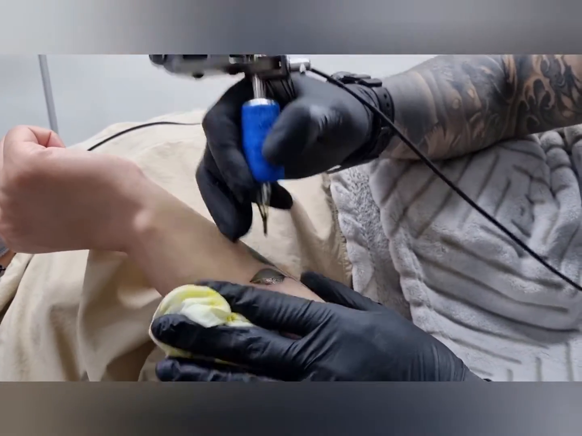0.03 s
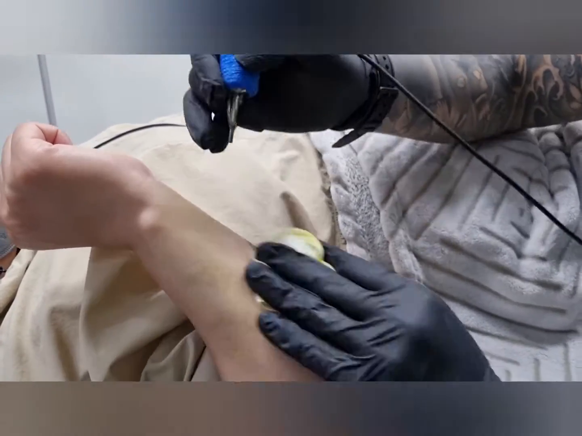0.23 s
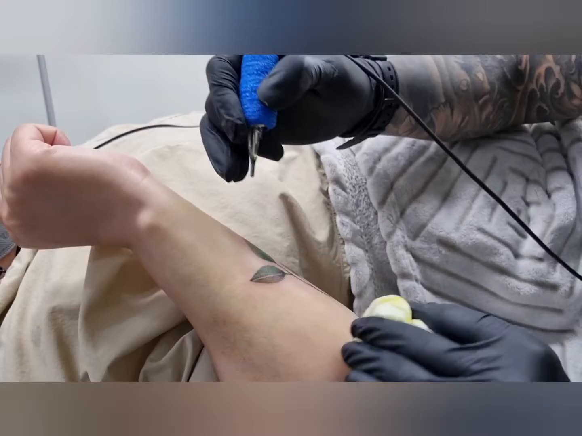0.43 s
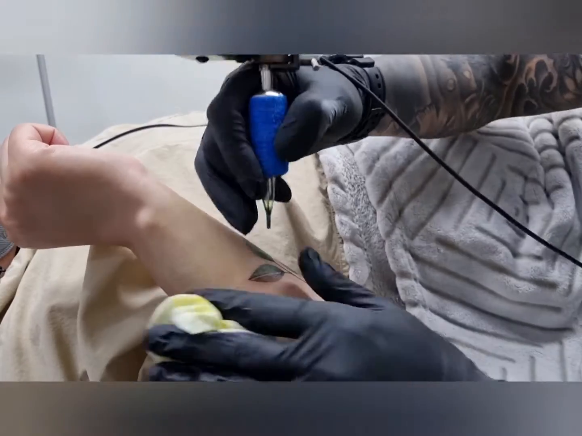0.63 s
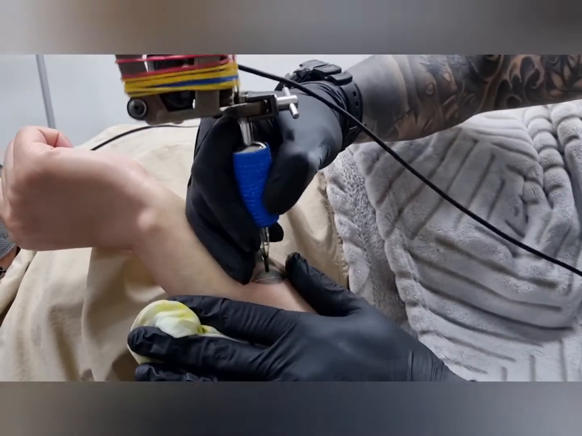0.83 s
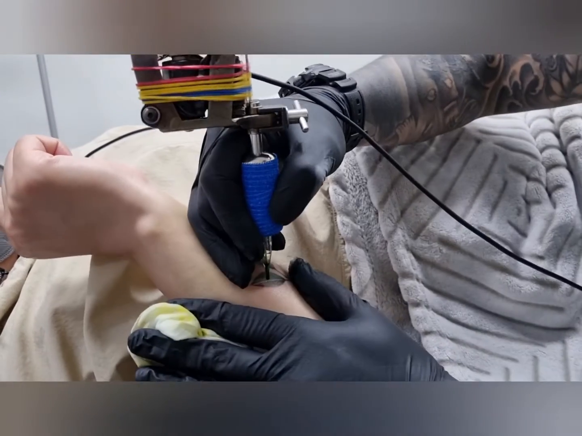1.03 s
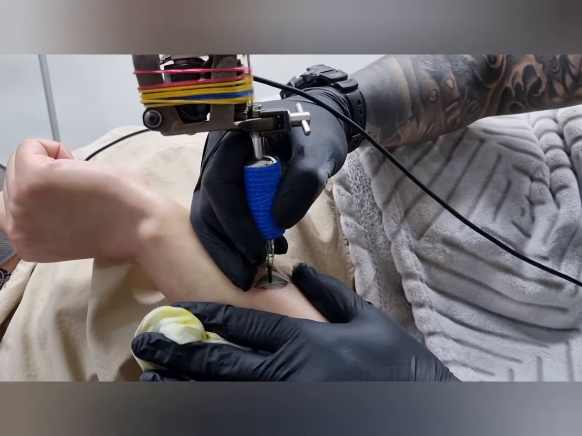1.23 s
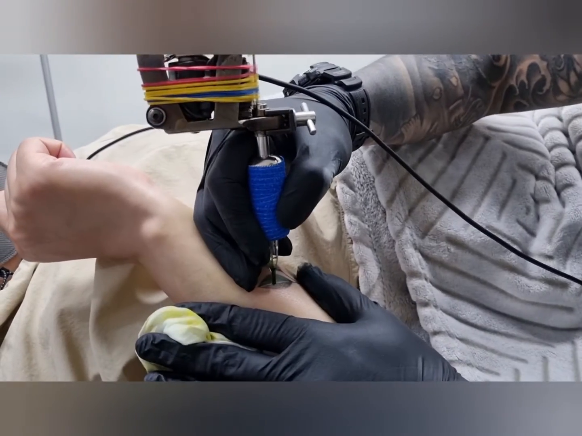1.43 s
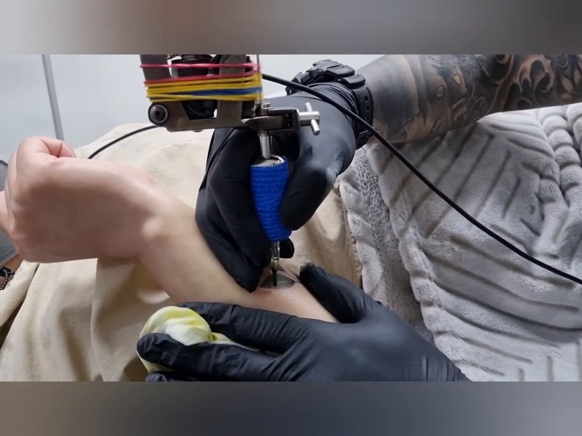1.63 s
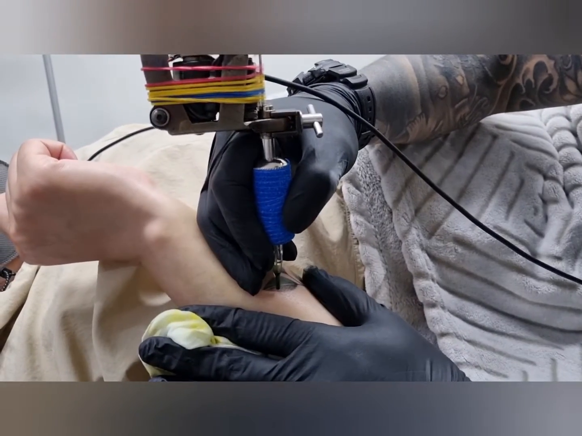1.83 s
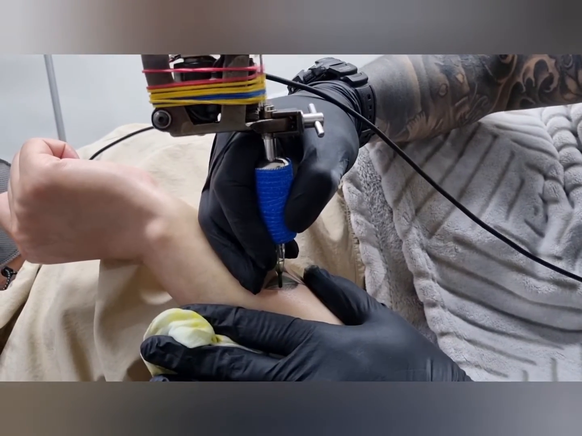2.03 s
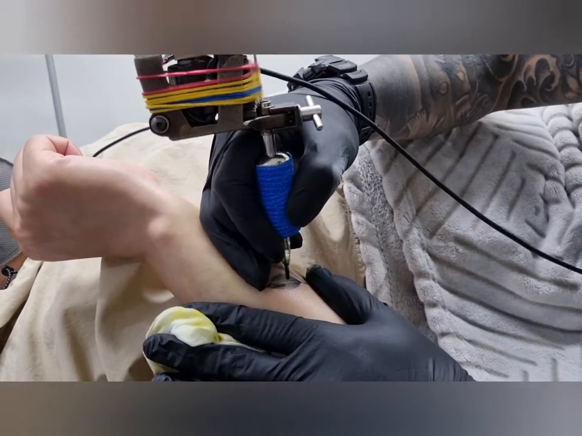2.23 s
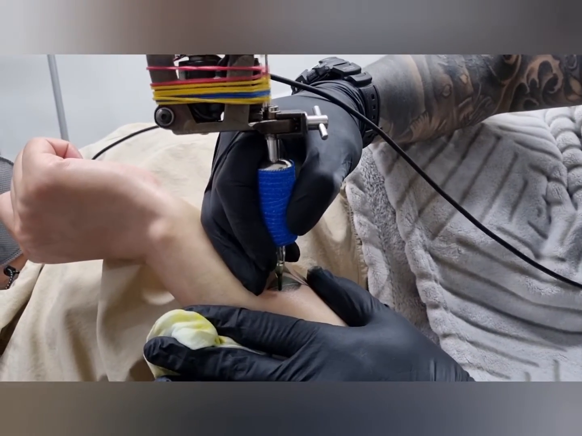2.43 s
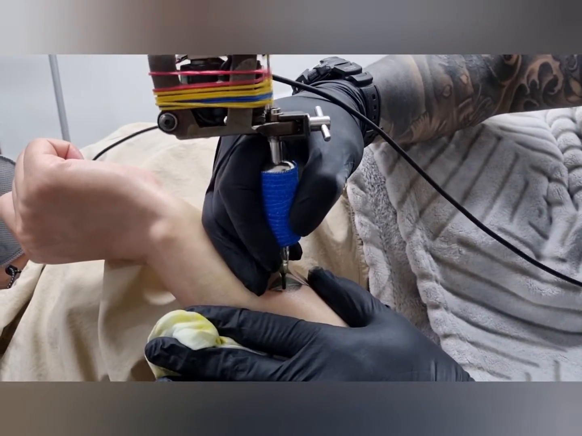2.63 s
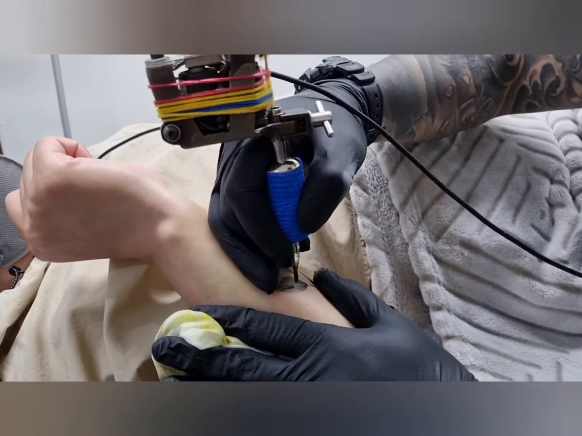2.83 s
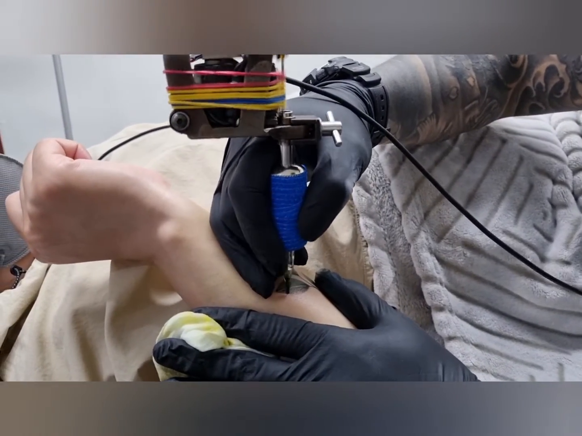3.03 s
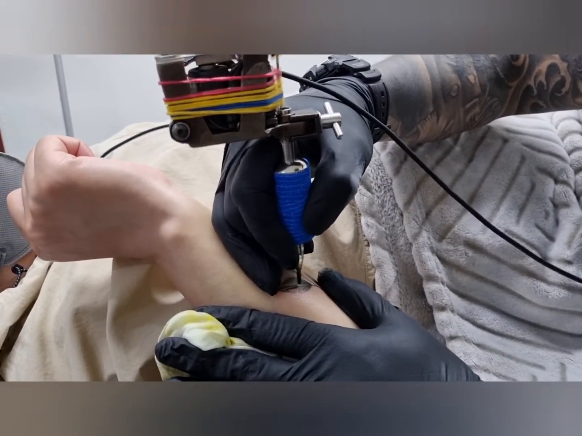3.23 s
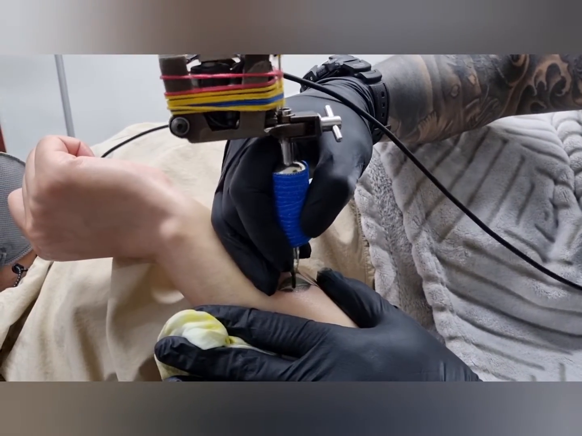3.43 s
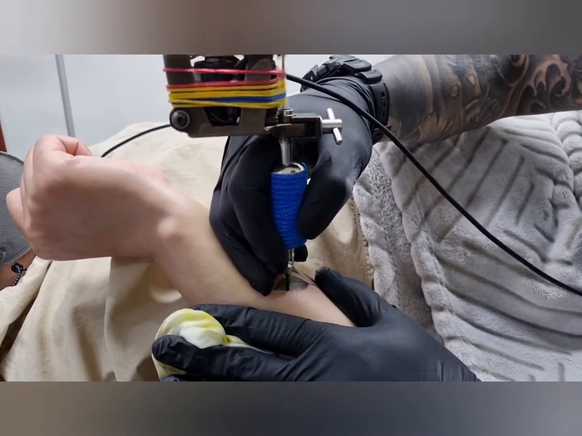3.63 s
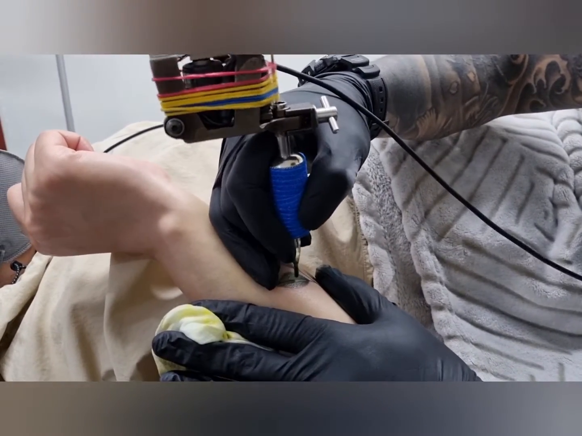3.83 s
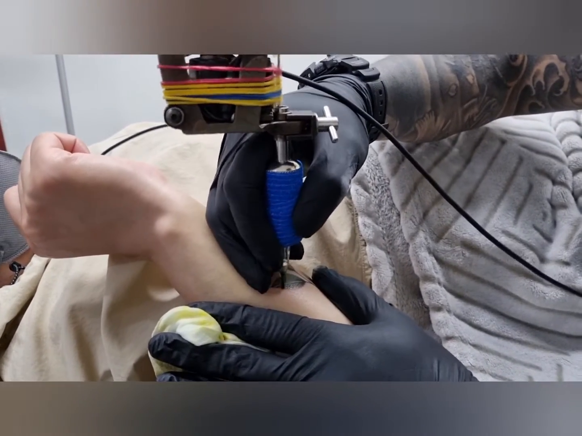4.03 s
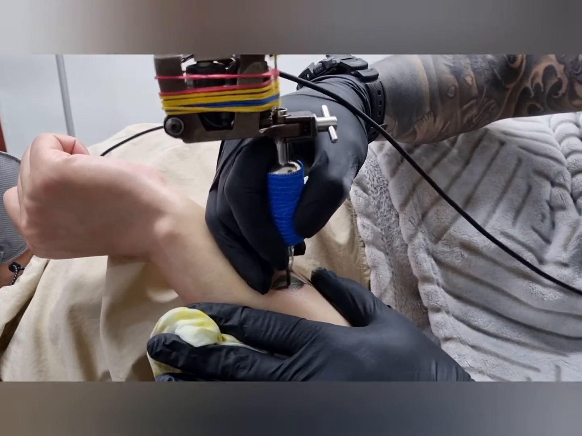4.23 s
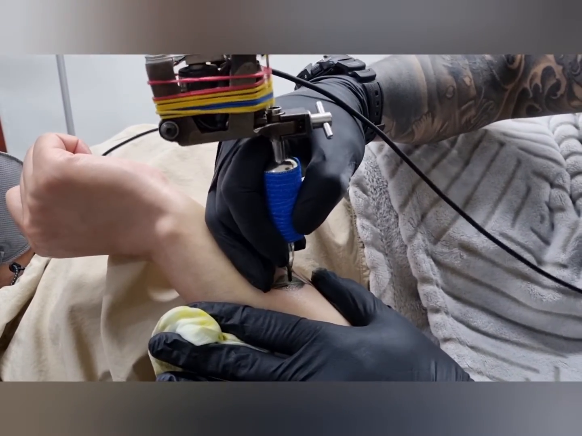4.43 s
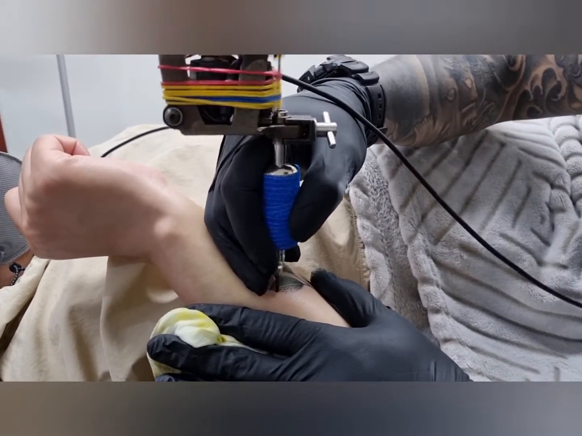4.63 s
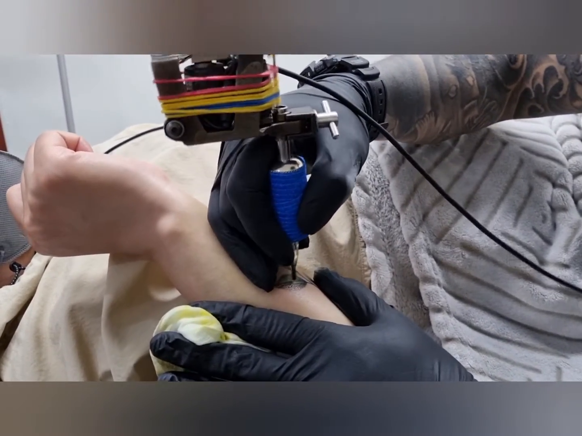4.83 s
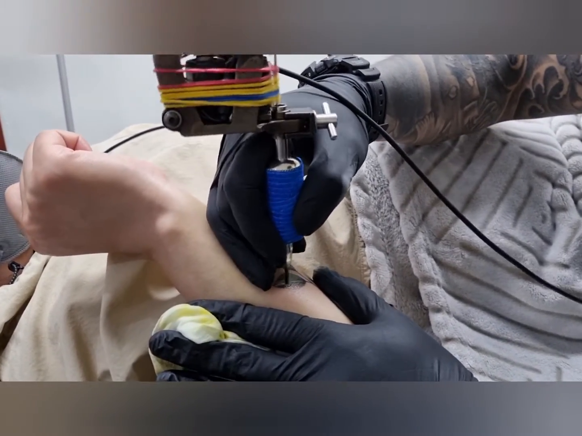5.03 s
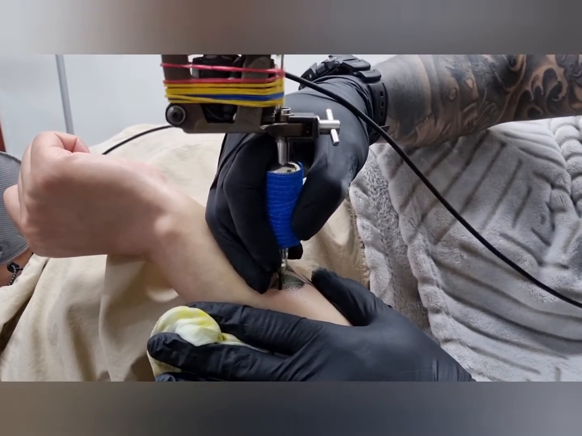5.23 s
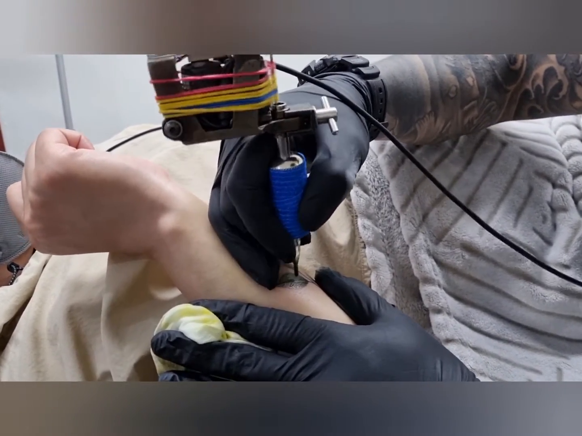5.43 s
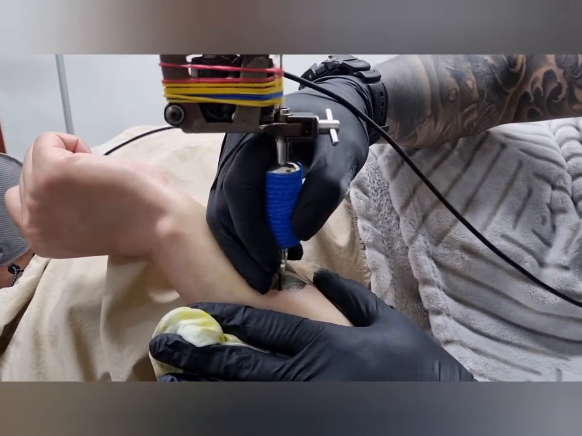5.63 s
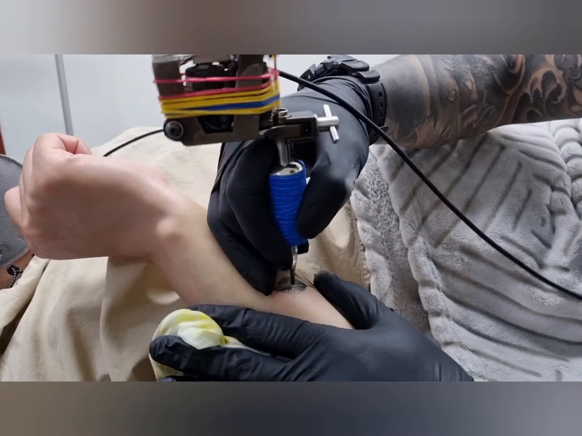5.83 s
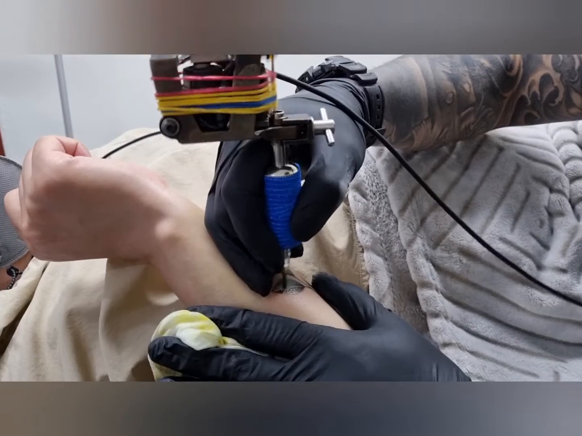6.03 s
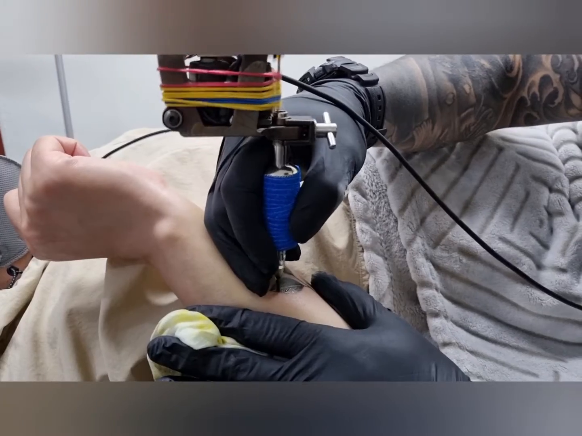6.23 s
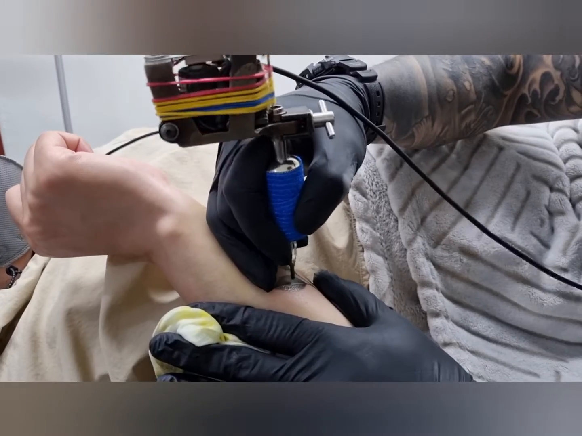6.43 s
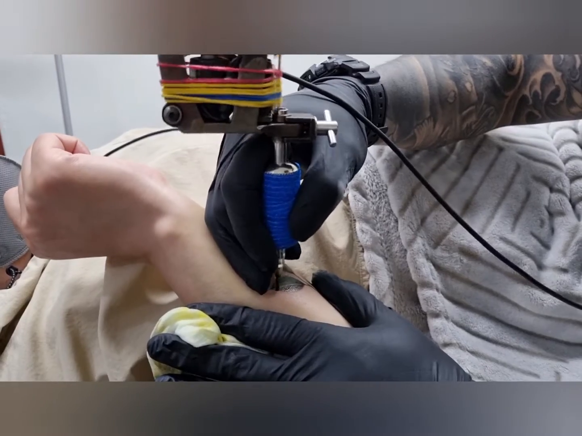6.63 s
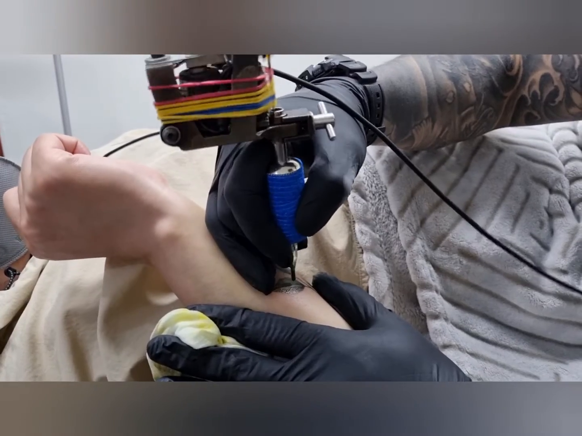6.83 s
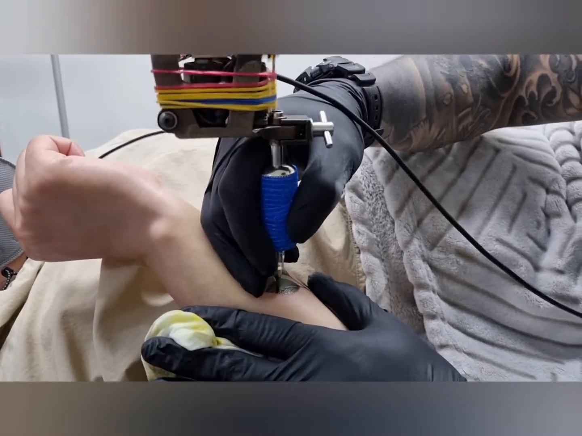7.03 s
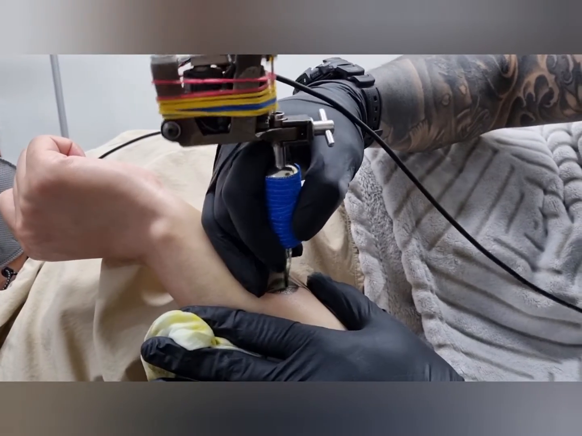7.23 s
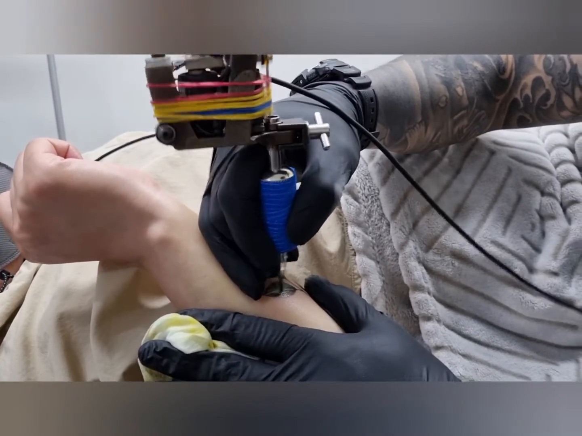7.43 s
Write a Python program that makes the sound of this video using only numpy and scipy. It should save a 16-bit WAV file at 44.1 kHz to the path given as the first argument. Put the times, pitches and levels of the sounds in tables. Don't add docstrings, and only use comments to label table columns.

```python
import sys
import numpy as np
from scipy import signal
from scipy.fft import rfft, irfft, next_fast_len
from scipy.io import wavfile
from scipy.ndimage import uniform_filter1d, map_coordinates

SR = 44100
rng = np.random.default_rng(int(sys.argv[2]) if len(sys.argv) > 2 else 0)


def linear_from_db(decibels):
    return 10 ** (np.asarray(decibels, float) / 20)


def dump(signal):
    limited = np.clip(np.atleast_2d(signal).T, -1, 1)
    pcm = np.round(limited * 32767).astype(np.int16)
    wavfile.write(sys.argv[1], SR, pcm)


N = 330750
T = np.arange(N) / SR


def unit(x):
    return x / np.sqrt(np.mean(x ** 2) + 1e-20)


def along(points, hz):
    f, v = np.transpose(points)
    return np.interp(np.log(hz + 1), np.log(f + 1), v)


def curves(rows):
    s, *cols = np.transpose(rows)
    return [np.interp(T, s, c) for c in cols]


def wobble(rate_hz):
    return map_coordinates(rng.standard_normal(int(N * rate_hz / SR) + 4), [T * rate_hz])


def filtered(x, response):
    m = next_fast_len(N + SR // 4)
    return irfft(rfft(x, m) * response(np.fft.rfftfreq(m, 1 / SR)), m)[..., :N]


def hiss(spectrum):
    return unit(filtered(rng.standard_normal((2, N)), lambda hz: linear_from_db(along(spectrum, hz))))


def steady(x, seconds):
    return x / np.sqrt(np.abs(uniform_filter1d(x ** 2, round(seconds * SR))) + 1e-9)


def panned(db):
    return linear_from_db(np.array([db / 2, -db / 2])).reshape(2, -1)


def peak(f, hz, width_hz):
    return 1j * f * width_hz / (hz * hz - f * f + 1j * f * width_hz)


def mode(force, hz, width_hz, pan_db, soft=False):
    def shape(f):
        response = peak(f, hz, width_hz)
        return np.abs(response) ** 2 if soft else response
    return unit(filtered(force, shape)) * panned(pan_db)


# Hz, dB per Hz.
AIR = [(25, -44), (82, -10), (170, -5), (640, -17), (1040, -24.5), (2500, -24.5), (5400, -30), (15800, -39)]
# Hz, dB per Hz.
CLOTH = [(24, -46), (40, -13), (123, -2.5), (179, -5), (386, -3.5), (703, -11), (900, -5.5), (1170, -4.5),
         (1980, -120)]
# time in s, level in dB.
ARMREST_RUMBLE = [(1.1, -101), (1.2, -65), (1.45, -71), (1.8, -72.5), (2.05, -70.5), (2.2, -95)]


def room_tone():
    sway = linear_from_db(2.5 * wobble(9) + 2.5 * wobble(30))
    work = np.interp(T, [.7, 1.1, 1.9, 2.3, 3.3, 4.1], [0.13, 0.93, 1.0, 0.79, 0.94, 0.68])
    cloth = linear_from_db(-65.5) * sway * work * hiss(CLOTH) * panned(8.1)
    shaking = mode(rng.standard_normal(N), hz=200, width_hz=38, pan_db=12, soft=True)
    rumble = linear_from_db(curves(ARMREST_RUMBLE)[0]) * sway * shaking
    air = linear_from_db(-71 + 4.2 * wobble(11)) * hiss(AIR)
    return air + cloth + rumble


# Hz, t60 in s.
STUDIO_T60 = [(500, .2), (3000, .2), (5300, .28), (9000, .2), (13500, .19), (16000, .16)]


def studio(x, count=22):
    out = np.zeros((2, N + SR))
    edges = np.linspace(0, N, count + 1).astype(int)
    for a, b in zip(edges, edges[1:]):
        hz, t, z = signal.stft(rng.standard_normal((2, SR // 3)), SR, nperseg=256)
        decay = linear_from_db(-60 * t / along(STUDIO_T60, hz)[:, None])
        tail = signal.istft(z * decay, SR, nperseg=256)[1]
        wet = signal.fftconvolve(x[:, a:b], tail / np.linalg.norm(tail[0]), axes=1)
        out[:, a + 60:a + 60 + wet.shape[1]] += wet
    return out[:, :N]


# start in s, peak in dB, centre in Hz, width in Hz, length in ms.
TICKS = [(.008, -56.5, 1220, 302, 28), (0.081, -53, 500, 1460, 2.5), (0.154, -54, 3930, 5000, 2.5),
         (0.329, -67.5, 3400, 4970, 26), (0.384, -59, 1330, 1085, 5.8), (0.455, -56, 5450, 12200, 2.4),
         (0.46, -66, 1260, 600, 4.9), (.46, -71, 13500, 2500, 22), (.49, -68, 1930, 300, 27),
         (0.548, -69, 5600, 1500, 22), (.562, -68, 12000, 6000, 10), (0.574, -45, 8740, 9000, 2.7),
         (0.583, -38, 7950, 4000, 0.93), (0.588, -39.5, 1180, 4000, 0.79)]


def ticks():
    out = np.zeros((2, N))
    t = np.arange(SR // 6) / SR
    f = np.fft.rfftfreq(len(t), 1 / SR)
    for s, db, hz, width_hz, ms in TICKS:
        envelope = np.exp(-t * 1000 / ms) * (1 - np.exp(-t * 5000 / ms))
        burst = rng.standard_normal((2, len(t))) * envelope
        burst = irfft(rfft(burst) * peak(f, hz, width_hz) ** 2, len(t))
        out[:, round(s * SR):][:, :len(t)] += linear_from_db(db + 7.5) * burst / np.abs(burst).max()
    return out + linear_from_db(-8.0) * studio(out, count=1)


# time in s, level in dB, left-right in dB.
JOLTS = [(3.276, -49, 22), (3.284, -40, -6), (3.361, -45, 13.5), (3.493, -47, 17), (3.509, -47, 14),
         (3.517, -49, 10), (3.579, -47.5, 9), (3.657, -49.5, 17), (3.765, -55, -11), (3.802, -50, -17),
         (3.833, -45, 8), (3.857, -51.5, -16), (3.903, -46.5, 11), (3.92, -54, 6), (3.957, -50, -13),
         (3.98, -53, 5), (4.08, -51, 8), (4.215, -45, -10), (4.4, -53, -14), (4.44, -53, -2),
         (4.305, -45.5, -18), (4.645, -48, -8), (4.738, -49.5, -15), (4.746, -43, -10), (5.04, -44, 1),
         (5.297, -42.5, 8), (5.313, -48, -7), (5.336, -42, 5), (5.362, -44, -14), (5.378, -55, 1),
         (5.393, -55, -8), (5.447, -60, 6), (5.51, -55, 3), (5.58, -62, 5), (5.642, -55, 14),
         (5.741, -40, 9), (5.81, -42.5, 11), (5.833, -39, 8), (6.257, -40, -9), (6.265, -42, 9.5),
         (6.295, -30.5, 4), (6.357, -36, 1.5), (6.534, -34.5, 3), (6.557, -40, 12.5), (6.755, -34, 6),
         (6.778, -34, 4), (6.802, -29.5, 2), (6.955, -48, 17), (7.02, -39.5, 11.5), (7.205, -36, 8.5),
         (7.243, -44, 2), (7.29, -45, -4), (7.4, -50, 14)]
# Hz, dB.
THUD = [(25, -20.5), (60, 6.5), (130, -4.5), (260, -5.5), (500, -11), (1000, -21), (2000, -31.5),
        (4000, -62)]
THUD_SCATTER_DB, PORT_SCATTER_DB = 2.5, 1.5
SWEEP_CYCLES, SWEEP_TURN, SWEEP_EARLY_S = .65, .77, .0015
REVERSED_TO_HZ = 900
RIGHT_LOW_HZ = 88
BODY_PATH_DB = 44


def carried(since_ms, strength, thud):
    hits = np.flatnonzero((since_ms[1:] >= 0) & (since_ms[:-1] < 0))
    luck = rng.standard_normal((len(hits), 3)).T
    size = thud[:, hits] * linear_from_db(THUD_SCATTER_DB * luck[0] + PORT_SCATTER_DB * luck[1:])
    for s, db, pan_db in JOLTS:
        size[:, np.abs(T[hits] - s).argmin()] = linear_from_db(db) * panned(pan_db)[:, 0]
    kicks = np.zeros((2, N))
    kicks[:, hits] = size * strength[hits] * [[1], [-1]]

    def body(hz):
        cycles = SWEEP_CYCLES * np.log(hz / 1000 + 0.001) + SWEEP_TURN - hz * SWEEP_EARLY_S
        sweep = np.exp(-2j * np.pi * cycles)
        turn = np.exp(2j * np.arctan((hz / REVERSED_TO_HZ) ** 2) / np.sqrt(2))
        right = hz / np.hypot(hz, RIGHT_LOW_HZ) * turn
        return linear_from_db(along(THUD, hz)) * sweep * [hz * 0 + 1, right]
    return linear_from_db(BODY_PATH_DB) * filtered(kicks, body)


# time in s, level in dB, left-right in dB, length in ms.
BUMPS = [(3.216, -52.5, 3, 49), (3.278, -62, -4, 8.2), (3.33, -57, -18, 21), (3.39, -59, -15, 15),
         (3.5, -42.5, -5, 10), (3.579, -51, 1, 14), (3.659, -45.5, -4, 12), (3.82, -72, -8, 20),
         (3.904, -54, -8, 14), (3.97, -53, -2, 12), (4.09, -64, -11, 7.6), (4.164, -51, 5, 23),
         (4.218, -46, -6, 6.4), (4.305, -48, -5, 11), (4.499, -47, -8.5, 34), (4.646, -35, -1, 6.8),
         (4.772, -42.5, -1.5, 20), (4.887, -50, -9.5, 20), (5.038, -41, 0.5, 7.7), (5.363, -56.5, -19, 45),
         (5.45, -71, -7, 7.3), (5.515, -54, -4, 10), (5.585, -54, -9, 12), (5.625, -55, 5, 14),
         (5.742, -45, 1.5, 30), (5.833, -51.5, -0.5, 48), (6.08, -54.5, 0, 64), (6.271, -39, 5, 16),
         (6.361, -50, -13, 14), (6.405, -45.5, 5, 55), (6.556, -40, 2.5, 16), (6.652, -48.5, 0, 16),
         (6.744, -47.5, 5, 30), (6.798, -44, 9, 20), (6.876, -51, -8, 16), (7.009, -45.5, -1, 64),
         (7.237, -44, 5.5, 45), (7.455, -44, 3, 60)]
# time in s, share 0-1.
CARRIED_SHARE = [(3, 0.5), (5.5, 0.65), (6.3, 0.58), (7.5, 0.9)]
# Hz, dB per Hz.
RUB = [(12, -36), (25, -4), (70, -3.5), (110, -7.5), (170, -20.5), (300, -35)]
# Hz, dB.
KNOCK = [(60, -65), (120, 6), (300, 6), (800, -13.5), (1800, -8.5), (3500, -7)]
THUD_DB, THUD_GROWTH_DB_PER_DB = -53.5, 0.88
THUD_CARRIED_DB = 9
FIDGET_S, FIDGET_DB, FIDGET_SWING_DB = 3.18, -68, 5


def handling(since_ms, strength):
    rub, thud = np.zeros((2, 2, N))
    share = np.clip(curves(CARRIED_SHARE)[0], 0, 1)
    for s, rub_db, pan_db, ms in BUMPS:
        share_now = share[round(s * SR)]
        thud_db = THUD_DB + THUD_GROWTH_DB_PER_DB * (rub_db + 50) + THUD_CARRIED_DB * share_now
        near = slice(round((s - .1) * SR), round((s + .1) * SR))
        after_ms = (T[near] - s) * 1000
        length_ms = np.where(after_ms < 0, 0.79 * ms, 1.2 * ms)
        shape = np.exp(-(after_ms / length_ms) ** 2)
        rub[:, near] += linear_from_db(rub_db - 0.86 * share_now) * shape ** 0.5 * panned(pan_db)
        thud[:, near] += linear_from_db(thud_db) * shape ** 0.59 * panned(pan_db)
    fidget = linear_from_db(FIDGET_DB + FIDGET_SWING_DB * np.array([wobble(14), wobble(14)])) * (T > FIDGET_S)
    rub = rub + fidget
    thud = thud + linear_from_db(-2.5) * fidget
    knock = steady(hiss(KNOCK), 0.0046)
    knock = unit(knock[0] * [[1], [-1]] + .5 * knock[::-1])
    through_body = carried(since_ms, strength, np.sqrt(share) * thud)
    return rub * steady(hiss(RUB), 0.036) + through_body + np.sqrt(1 - share) * thud * knock


# time in s, lag in ms.
DRIFT = [(0.05, -2.44), (0.6, 2.42), (0.8, 2.58), (1.0, 3.47), (1.4, 3.95), (2.0, 4.55), (2.35, 5.7),
         (3.1, 5.05), (3.4, 5.4), (3.6, 6.1), (3.8, 6.0), (4.0, 7.1), (5.2, 8.35), (5.4, 7.95), (6.0, 7.56),
         (6.4, 7.0), (6.8, 6.05), (7.48, 5.45)]
# offset in ms, level in dB, scatter in ms.
IMPACTS = [
    (-.45, -13, .008),
    (-.22, -8, .004),
    (0, 0, .003),
    (.23, -6, .004),
    (.46, -10, .007),
    (.85, -13, .012),
]
STROKES_HZ = 129.6
STOP_S, START_S = .07, .586


def strokes(jitter_ms, scatter_db):
    lag_s = curves(DRIFT)[0] / 1000
    beat = STROKES_HZ * (T - lag_s - .0001 + .00005 * wobble(14))
    which = np.floor(beat + .25).astype(int)
    luck = rng.standard_normal((which.max() + 2, 2 + len(IMPACTS)))[which].T
    since_ms = (beat - which) * 1000 / STROKES_HZ - jitter_ms * luck[0]
    struck_s = T - since_ms / 1000
    running = (struck_s < STOP_S) | (struck_s > START_S)
    return beat, since_ms, linear_from_db(scatter_db * luck[1]) * running, luck[2:]


# ms after the slap, length in ms, level in dB.
BOUNCES = [
    (0, 0.7, 0),
    (1, 0.5, -6.5),
    (2.1, .6, -8),
    (3.5, 0.6, -15),
    (5.2, .8, -11),
    (-1.2, 0.7, -6),
    (2, 5, -19),
]
# Hz, share 0-1.
ROUGH = [(1000, 0.08), (3500, 0.33), (5500, 0.3), (7500, 0.55), (10500, 0.4), (12000, .3), (15000, 0.55)]
# Hz, delay in ms.
SPREAD = [(3000, -.8), (5500, -.3), (8500, -.25), (11000, -.05), (16000, 0)]


def click(ms):
    return np.sinc(ms * SR / 1200) * np.exp(-(ms / .4) ** 2)


def slap(since_ms, strength, luck):
    main = strength * click(since_ms)
    cluster = strength * sum(linear_from_db(db) * click(since_ms - ms - scatter_ms * u)
                             for (ms, db, scatter_ms), u in zip(IMPACTS, luck))
    gate = sum(linear_from_db(db) * np.exp(-((since_ms - ms) / length_ms) ** 2) for ms, length_ms, db in BOUNCES)
    grains = np.tanh(rng.standard_normal(N) + 2.7 * rng.standard_normal((2, N)))
    chatter = strength * gate * grains

    def rough(hz):
        return np.clip(along(ROUGH, hz), 0, 1)

    def late(hz):
        cycles = np.cumsum(along(SPREAD, hz)) * hz[1] / 1000
        return np.sqrt(1 - rough(hz)) * np.exp(-2j * np.pi * cycles)

    def heavy(hz):
        return 1 / (1 + (hz / 6500) ** 8)
    return (filtered(unit(main), lambda hz: late(hz) * heavy(hz))
            + filtered(unit(cluster), lambda hz: late(hz) * (1 - heavy(hz)))
            + filtered(unit(chatter), lambda hz: np.sqrt(rough(hz))))


# Hz, width in Hz, then left and right dB when raised, upright and tilted.
LOW_MODES = [(1224, 390, -23, -13, -16.5, -36, -27, -64), (1543, 118, -22, -32, -9.5, -28, -8.5, -14),
             (2115, 154, -9.5, -16, -5, -6, -4, -10.5), (2638, 26, -24, -22, -1.5, -26, 3.5, -0.5),
             (3115, 660, -7.5, -1.5, -6, -2.5, -17, -5), (3856, 112, -35, 2, -52, 3.5, -46, 3.5)]
LOW_LATE_MS = [3, 1.6, 0, 2.6, 3.7, .9]
# Hz, width in Hz, then left and right dB when raised, upright and tilted.
TREBLE_MODES = [(4874, 440, -12, 5.5, -32, -0.5, -31, -1.5), (6290, 640, -1, -1, -4.5, 2, -5.5, 1.5),
                (7044, 115, 6, 10, 1, 5, 5.5, -18.5), (7780, 350, 11.5, -8, 3.5, -8, 0, 3.5),
                (8556, 800, 4, -7, 3, -4, 4, -34), (9950, 330, 9.5, 4, -4, -25, -11, 10.5),
                (11810, 1120, 4.5, 7, 0, 3.5, 4.5, 2), (13560, 410, 8, 11, -2, 7.5, 7.5, 7),
                (12250, 920, -9, -17, 7, 7, -17, 7.5), (14500, 360, 0, 8, 5, 0, -0.5, 5),
                (14700, 970, -1, 3.5, -5.5, -3, 4, 5), (14800, 480, 14, -1, 4.5, -5, -4, -6)]
# Hz, width in Hz, depth 0-1.
NOTCHES = [(1760, 120, .4), (2400, 140, .45), (3330, 250, .45)]
# Hz, width in Hz, depth 0-1.
SHADOWS = [(10800, 600, .45), (12850, 700, .5), (14150, 300, .3)]
TREBLE_FROM_HZ = 3000
TILTED_LAG_US = 41


def frame(force, tilt):
    def heard(f):
        modes = LOW_MODES + TREBLE_MODES
        shapes = np.array([peak(f, row[0], row[1]) for row in modes])
        gains = linear_from_db(np.transpose(modes)[2:])
        right_tilted = np.arange(6) == 5
        lag = np.exp(-2j * np.pi * np.outer(right_tilted, np.clip(f - 9500, 0, None)) * TILTED_LAG_US / 1e6)
        lag = lag / (1 + (TREBLE_FROM_HZ / (f + 1)) ** 8)
        lag[4:] *= np.prod([1 - depth * np.abs(peak(f, hz, width_hz)) ** 2
                            for hz, width_hz, depth in SHADOWS], axis=0)
        paths = np.exp(-2j * np.pi * np.outer(LOW_LATE_MS, f) / 1000)
        gaps = np.prod([1 - depth * peak(f, hz, width_hz) for hz, width_hz, depth in NOTCHES], axis=0)
        low = gaps * (gains[:, :6] @ (shapes[:6] * paths))
        treble = lag * np.sqrt(gains[:, 6:] ** 2 @ np.abs(shapes[6:]) ** 2)
        return low + treble
    views = filtered(np.tile(force, (3, 1)), heard).reshape(3, 2, N)
    tilt = np.clip(tilt, 0, 2)
    return sum(np.clip(1 - np.abs(tilt - k), 0, 1) * view for k, view in enumerate(views))


# time in s, level in dB, left-right in dB.
LEVEL = [(0, -31, 1), (.062, -33.5, -5), (.6, -33.5, 0), (1.0, -31, 2.5), (2, -30.5, 2.5), (3.3, -32, 1.5),
         (5, -32, 1), (7.5, -32, 0.5)]
# time in s, tilt (0 raised, 1 upright, 2 tilted).
TILT = [
    (0, .3),
    (.07, .3),
    (.6, 0),
    (.7, .1),
    (.85, .9),
    (2.4, 1),
    (3.2, 1.6),
    (4.2, 1.9),
    (7.5, 2),
]
CIRCLES_S = [.3, .77, 1.2, 1.65, 2.1, 2.55, 3.05, 3.55, 4.1, 4.65, 5.17, 5.7, 6.2, 6.63, 7.12, 7.55]
TOUCH_S, TOUCH_LENGTH_S = 0.73, 0.045
FREE_DB, LOADED_DB, TILTED_DB = -18, -14, 0.5
GLINT_DB, GLINT_TILTED_DB, GLINT_SWING_DB = -28.5, 6, 6
PAN_SWING_DB = 0.5


def posture():
    level_db, pan_db = curves(LEVEL)
    tilted = np.clip(curves(TILT)[0] - 1, 0, 1)
    facing = np.cos(2 * np.pi * np.interp(T, CIRCLES_S, np.arange(len(CIRCLES_S))))
    loaded = np.clip((T - TOUCH_S) / TOUCH_LENGTH_S, 0, 1)
    spring_db = FREE_DB + loaded * (LOADED_DB - FREE_DB) + TILTED_DB * tilted + 0.27 * wobble(16)
    glint_db = GLINT_DB + (GLINT_TILTED_DB + GLINT_SWING_DB * np.tanh(2 * facing)) * tilted
    return level_db, spring_db, glint_db, pan_db + PAN_SWING_DB * facing


# multiple of the stroke rate, level in dB.
HUM = [(1, -73.5), (2, -77), (3, -79), (4, -82), (5, -87), (7, -79), (8, -80)]
# Hz, radians.
TURN = [(1200, 2.7), (2000, 4.3), (4500, 3.3), (5500, 1.1), (8300, 4), (9200, 2.5), (12000, .3),
        (15000, -2.8)]
# Hz, dB.
WALLS = [(1500, -5), (6000, -5), (8000, 0)]
ROOM_DB, GLOW_DB = -5.5, -11


def machine(beat, since_ms, strength, luck):
    level_db, spring_db, glint_db, pan_db = posture()
    tilt = curves(TILT)[0]
    force = slap(since_ms, strength, luck)
    spring = mode(force, hz=5510, width_hz=130, pan_db=-14)
    glint = mode(force, hz=13820, width_hz=500, pan_db=-1.5, soft=True)
    glow = mode(force, hz=11880, width_hz=650, pan_db=1, soft=True)
    ring = unit(frame(force, tilt)) + linear_from_db(spring_db - 2.5) * spring + linear_from_db(glint_db) * glint
    ring = ring + linear_from_db(GLOW_DB) * np.clip(tilt - 1, 0, 1) * glow
    ring = ring * linear_from_db(level_db + 0.65) * panned(pan_db)
    direct = filtered(ring, lambda hz: [hz * 0 + 1, np.exp(1j * along(TURN, hz))])
    room = studio(filtered(ring, lambda hz: linear_from_db(along(WALLS, hz))))
    hum = sum(linear_from_db(db + 3 * wobble(12)) * np.sin(2 * np.pi * k * beat + k * k) for k, db in HUM)
    return direct + linear_from_db(ROOM_DB) * room + hum * (strength > 0) * panned(9.1)


def scene():
    beat, since_ms, strength, luck = strokes(jitter_ms=0.0053, scatter_db=-1.05)
    background = room_tone() + ticks() + handling(since_ms, strength)
    return background + machine(beat, since_ms, strength, luck)


def band_limit(x):
    return signal.sosfilt(signal.butter(12, 17100, fs=SR, output="sos"), x)


def record(dry):
    heard = filtered(dry, lambda hz: np.clip((15900 - hz) / 150, 0, 1))
    return band_limit(heard)


dry = scene()
out = record(dry)
dump(out)
```